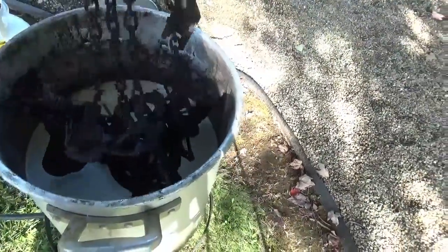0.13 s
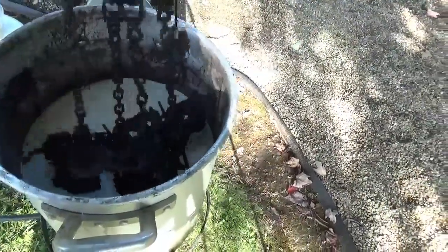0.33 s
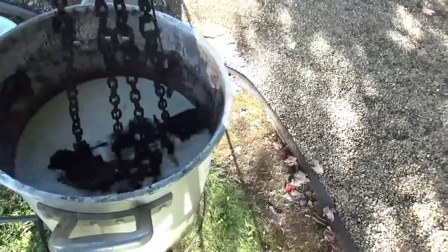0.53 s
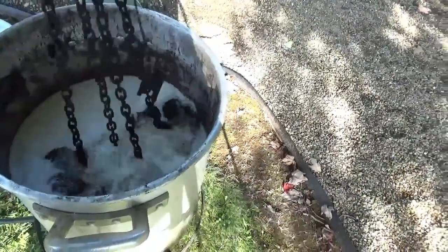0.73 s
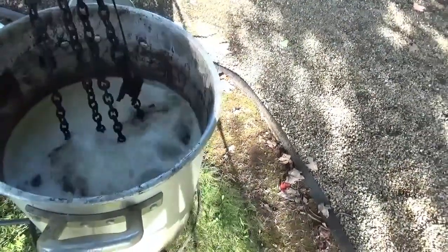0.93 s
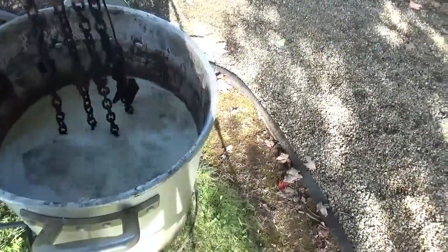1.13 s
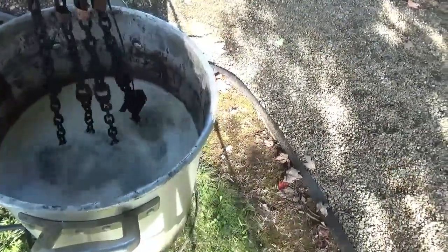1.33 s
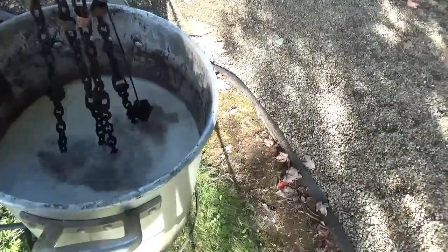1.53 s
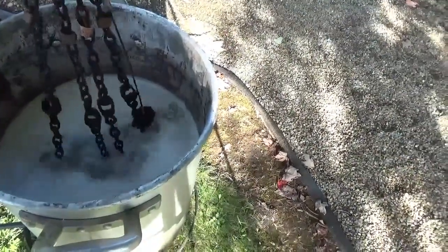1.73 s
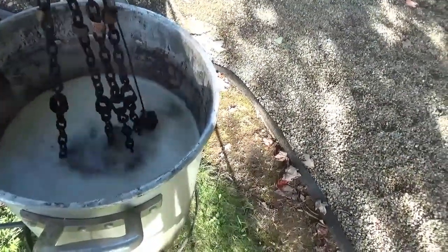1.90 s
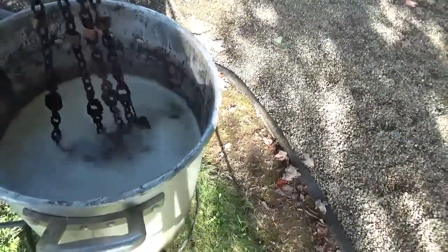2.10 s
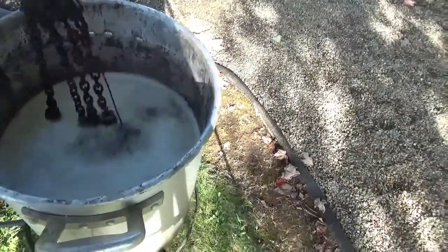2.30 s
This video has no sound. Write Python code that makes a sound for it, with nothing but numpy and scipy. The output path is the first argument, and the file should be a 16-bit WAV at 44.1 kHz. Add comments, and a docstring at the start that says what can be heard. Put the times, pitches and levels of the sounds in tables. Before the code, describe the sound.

Steel traps on chains rattle into a metal pot of water, close and nearly dry, over faint outdoor hiss. Quick scrapes and hard clinks crowd 0-0.45 s, loudest around 0.25; lighter ticks and scrapes follow to 0.75, with thin link pings. Fizz swells near 1 s, then a strong boomy clank at 1.1. Sparse dull knocks follow, thickening from 2.06 into a clattering cluster at 2.26-2.3 with low rising glugs.

```python
"""Steel traps lowered into a pot of hot water

Outdoors, steel traps on chains go down into a metal pot. Stick-slip scrapes and impulsive knocks
excite the damped modes of steel and pot; loose links rustle and ping. Under water the knocks turn
dull as the pot's bass grows, and trapped air glugs up as tones of rising pitch.
Fine fizz swells as water closes over the steel; soft filtered-noise hiss lies under it all.
"""
import sys
import numpy as np
from scipy import signal
from scipy.fft import rfft, irfft, next_fast_len
from scipy.io import wavfile

SR = 44100
rng = np.random.default_rng(int(sys.argv[2]) if len(sys.argv) > 2 else 0)


def persist_wave(psi):
    """Save psi, clipped to +-1, as 16-bit WAV."""
    counts = np.round(np.clip(psi, -1, 1) * 32767).astype(np.int16)
    wavfile.write(sys.argv[1], SR, np.atleast_2d(counts).T)


N = 103943
T = np.arange(N) / SR
AGE = T[:8192]  # time since the start of one event, s

# Steady background, spectrum of its mid part: f/Hz, level/dB
HISS_SPECTRUM = [(20, -26), (40, -30), (80, -11), (160, -13), (330, -10.5), (480, -10.5), (740, -15),
                 (1300, -12.5), (3400, -9), (5200, -12.5), (6500, -12), (11000, -13), (14000, -39)]
# Side part of the background against its mid part: f/Hz, level/dB
HISS_SIDE_SPECTRUM = [(30, -3), (70, -12), (150, -21), (1000, -2), (9000, -8)]
HISS_DB = -44.5  # rms of the mid part before panning

# Rustle of loose links: t/s, level/dB
RUSTLE_LEVEL = [(0, -33.5), (.09, -45.5), (.2, -38.5), (.42, -40), (.49, -58), (.65, -43.5), (.76, -44),
                (.84, -67), (.96, -45), (1.06, -50), (1.25, -53.5), (1.98, -50), (2.12, -44.5), (2.35, -43)]
# Churning of the water: t/s, level/dB
CHURN_LEVEL = [(0, -45), (.4, -44), (.7, -47), (.82, -52.5), (1.03, -49.5), (1.16, -43.5), (1.3, -54.5),
               (1.47, -55.5), (1.75, -47.5), (1.92, -55.5), (2.02, -51), (2.2, -43.5), (2.31, -36),
               (2.36, -49)]
# Bass of the pot, booming only once the traps are in the water: t/s, level/dB
BOOM_LEVEL = [(0, -41), (.22, -35), (.35, -6), (.7, -10), (.95, -9), (1.12, 4), (1.5, 6), (2.3, 9.5)]
# Fizz as the water closes over the steel: t/s, level/dB
FIZZ_LEVEL = [(.7, -56), (.86, -49), (.94, -47.5), (1.06, -46.5), (1.13, -48), (1.3, -58)]
RUSTLE_PER_S, CHURN_PER_S, FIZZ_PER_S = 1000, 900, 400  # mean rates of tiny impacts
BOOM_HZ = 410  # below this the pot's bass is weighted separately

# Spectra of a contact on steel, on bright edges and on the pot, and of the fizz: f/Hz, level/dB
STEEL_SPECTRUM = [(300, -41), (800, -4.5), (1200, 3.5), (2200, 3.5), (2650, -1.5), (3700, 3.5), (5400, 2.5),
                  (6500, -16), (11000, -11)]
RASP_SPECTRUM = [(1000, -88), (5000, -20), (6200, 2.5), (7600, 13.5), (8700, 4.5), (9700, 8.5),
                 (10800, 12.5), (12000, -15)]
POT_SPECTRUM = [(30, -36), (90, -16.5), (160, -3.5), (300, -0.5), (460, -3.5), (750, -1), (1150, -4.5),
                (1600, -1), (2400, -8.5), (6000, -20)]
FIZZ_SPECTRUM = [(400, -24), (750, -18), (1100, 3), (1800, -11), (2600, -24), (3200, -2), (3850, 4),
                 (4700, 8), (5200, -1), (6500, -46)]
FLAT_SPECTRUM = [(1, 0), (SR, 0)]

# Modes of traps and chains, of the pot, and of a free link: f/Hz, level/dB, t60/s
STEEL_MODES = [(1073, 4.5, 0.24), (1370, 6.5, 0.041), (1453, -7.5, 0.21), (1695, -6, 0.21),
               (2040, 10, 0.057), (2226, 12, 0.023), (2585, 3, 0.049), (2945, 13.5, 0.055),
               (3264, 9.5, 0.042), (3750, 12, .025), (4070, -1.5, 0.04), (4000, -7.5, 0.041),
               (4460, 6.5, 0.063), (4880, 5, 0.036), (5120, -36, 0.041)]
POT_MODES = [(257, -20.5, 0.31), (345, -2.5, 0.11), (504, -16.5, 0.057), (635, -7, 0.069), (765, 5, 0.044),
             (724, 6, 0.017), (1050, 1, 0.13), (1130, 4.5, 0.031)]
LINK_MODES = [(3140, -24, .12), (3900, -8.5, 0.049), (8320, -25, 0.62), (9550, -2, 0.049)]
STEEL_RING_DB, POT_RING_DB = -13, -15.5  # ringing against the click of contact
# Reflections inside the pot, against the click of contact
ECHO_DB, ECHO_T60_S, POT_ECHO_DB, POT_ECHO_T60_S = -9.5, 0.038, -12.5, 0.18

# Steel sliding on steel: t/s, length/s, steel level/dB, bright rasp level/dB, pot level/dB,
# rubbed part f/Hz
SCRAPES = [(.003, 0.0087, -37.5, -48, -31, 1350), (0.025, 0.0084, -37, -47, -46, 1700),
           (0.053, .008, -46, -47, -67, 4900), (0.1208, 0.0085, -29, -34.5, -44, 2190),
           (0.131, 0.0067, -26.5, -44, -41, 3650), (0.142, 0.018, -28.5, -39.5, -31, 4660),
           (0.168, 0.036, -32.5, -44, -37.5, 4500), (0.201, 0.018, -24, -48, -64, 1560),
           (0.22, 0.014, -21, -49, -48, 1380), (0.233, .026, -21, -55, -41, 3230),
           (0.262, 0.013, -21, -32.5, -38, 5130), (0.304, 0.014, -33, -40, -35, 1720),
           (0.317, 0.029, -45, -38.5, -44, 3900), (.3448, 0.0057, -26.5, -24.5, -46, 3900),
           (0.3535, 0.028, -25.5, -38, -36.5, 2257), (.397, 0.022, -35, -49, -41.5, 4380),
           (.435, 0.01, -33.5, -42, -35, 4580), (0.543, 0.0043, -39, -46, -66, 4260),
           (0.567, 0.0038, -38, -39.5, -55, 4200), (0.606, .009, -35, -42, -52, 4290),
           (0.627, 0.0064, -47, -41, -38, 3630), (0.635, 0.01, -46, -56, -35.5, 1050),
           (0.665, 0.01, -35.5, -49, -43, 4670), (0.678, 0.0168, -31.5, -38, -36.5, 3750),
           (0.703, 0.012, -37.5, -42.5, -41, 4540), (.721, 0.0027, -30, -32, -40, 4460),
           (1.5, 0.0114, -45.5, -57, -40, 1190), (1.625, 0.007, -50, -64, -37, 1400),
           (2.256, 0.011, -28.5, -36, -29, 1610), (2.301, 0.0076, -38, -59, -31, 2050),
           (2.319, 0.019, -65, -60, -36, 1360)]
SLIPS_PER_S, SLIP_SPREAD_DB = 4500, 3.5
SCRAPE_EDGE_S = 0.0011  # linear rise time and time constant of the fall
RUBBED_PART_DB, RUBBED_PART_T60_S = -5.5, 0.039  # level against the scrape on steel

# Single knocks: t/s, steel level/dB, bright tick level/dB, pot level/dB, struck part f/Hz,
# struck part level/dB
KNOCKS = [(.2337, 5, -26, -32, 3160, 1.5), (.2483, 8, -16, -33, 4450, -24),
          (.3822, -9, -23, -17, 3810, -0.5), (.408, -11, -33, -36, 4540, -13),
          (.5074, -24, -43, -15, 1790, -28), (.5178, -9.5, -24, -6, 790, -32.5),
          (.5552, -8.5, -17.5, -28, 3030, -13.5), (.5956, -12.5, -16.5, -41, 4600, -29),
          (.6312, -8, -31, -33, 3700, -30), (.6597, -21, -18, -18, 3700, -28),
          (.7475, -13, -11.5, -33, 10800, -8.5), (.9155, -17, -24, -38, 3940, -19.5),
          (1.107, 4.5, -6.5, -10, 4410, 0.5), (1.1083, 1.5, -15, -2, 1310, -8),
          (1.1095, -1, -26, -27, 790, -4), (1.141, -12, -36, -14, 4500, -14),
          (1.162, -16, -31, -8.5, 1080, -8), (1.236, -25, -40, -23, 800, -28),
          (1.4955, -14.5, -18, -15, 5070, -14), (1.5325, -17, -19, -36, 3770, -20),
          (1.6235, -35, -44, -17, 764, -20), (1.649, -7.5, -14.5, -24, 5320, -7.5),
          (1.6502, -7, -20, -34, 2920, -11.5), (1.7255, -37, -41, -19.5, 740, -17),
          (1.769, -23, -37, -16, 1810, -31), (2.061, -15, -32, -17, 2000, -19),
          (2.0697, -9, -19, -15, 1870, -11), (2.098, -24, -34, -24, 1340, -20),
          (2.121, -12, -36, -31, 2030, -11.5), (2.1293, -4.5, -32, -14, 5030, -14),
          (2.169, -10.5, -41, -11.5, 2000, -11), (2.186, -13, -39, -17, 760, -10),
          (2.211, -22, -28, -28, 4740, -20), (2.229, -23, -26, -31, 2000, -15),
          (2.2575, 0.5, -12, -22, 5500, 0), (2.2609, -13, -22, -2.5, 1630, -11.5),
          (2.2755, 1, -12, -10.5, 3670, -27), (2.289, -5.5, -12, 0, 5280, 1)]
CHATTER_PEAK_S, CHATTER_DB = 0.00099, -7  # peak of the chatter envelope; gain of its noise
PART_T60_S, PART_RISE_S = 0.01, 0.002
SHUDDER_DB, SHUDDER_T60_S = -2, 0.062  # the pot shudders on, level against the click

# Air glugging out of the traps: t/s, level/dB, starting f/Hz
GLUGS = [(.303, -17, 300), (0.358, -40, 332), (.515, -20, 356), (0.647, -24.5, 345), (0.72, -23.5, 340),
         (1.176, -22.5, 317), (1.634, -37, 340), (1.773, -30, 298), (1.799, -26, 345), (1.85, -27, 241),
         (1.941, -29.5, 296), (2.166, -14.5, 218), (2.262, -17, 300), (2.289, -17, 230), (2.304, -19, 331)]
GLUG_T60_S, GLUG_RISE_S = 0.043, 0.0061
GLUG_GLIDE_PER_S = 2.05  # rise in pitch per second, as a fraction of the starting pitch

# Ringing of a free link: t/s, level/dB
PINGS = [(0.4728, -27.5), (0.778, -20)]

# Gain added on the left and taken from the right
STEEL_PAN_DB, POT_PAN_DB, HISS_PAN_DB, PART_PAN_DB, EDGE_PAN_DB = 0.9, 0.6, 0.55, 1.3, 0.6
CUTOFF_HZ = 11000


def from_db(db):
    """Amplitude gain is ten to the power of a twentieth of the level in decibels."""
    return 10 ** (np.asarray(db) / 20)


def unit(x):
    """Normalisation: each channel is scaled to a sum of squares of one."""
    return x / np.sqrt(np.sum(x ** 2, axis=-1, keepdims=True) + 1e-20)


def pan(db):
    """Intensity stereo: opposite level changes on left and right."""
    return from_db([[db], [-db]])


def add(out, start_s, x):
    """Superposition: an event is summed in from its start time."""
    i = max(int(start_s * SR), 0)
    out[i:i + len(x)] += x[:N - i]


def level(curve):
    """Slow amplitude modulation: gain over time, interpolated in decibels."""
    return from_db(np.interp(T, *np.transpose(curve)))


def colour(x, spectrum):
    """Minimum-phase filtering: folding the cepstrum makes a causal filter from magnitudes."""
    size = next_fast_len(2 * x.shape[-1], real=True)
    size += size % 2
    hz, db = np.transpose(spectrum)
    log_bins = np.log(np.fft.rfftfreq(size, 1 / SR) + 1)
    magnitude = from_db(np.interp(log_bins, np.log(hz), db))
    cepstrum = irfft(np.log(magnitude))
    cepstrum[1:size // 2] *= 2
    cepstrum[size // 2 + 1:] = 0
    response = np.exp(rfft(cepstrum))
    return irfft(rfft(x, size) * response)[..., :x.shape[-1]]


def dying(t60):
    """Exponential damping: the amplitude falls by 60 dB in t60."""
    return np.exp(-np.log(1000) * AGE / t60)


def ringing(modes):
    """Modal superposition: a struck body sounds as a sum of damped cosines."""
    return sum(from_db(db) * dying(t60) * np.cos(2 * np.pi * hz * AGE) for hz, db, t60 in modes)


def contact(spectrum, echo_db, echo_t60, ring=0):
    """Impulse response: click, ringing and decaying noise reflections that differ left and right."""
    noise = rng.standard_normal((2, len(AGE)))
    echoes = from_db(echo_db) * unit(noise * dying(echo_t60))
    click = AGE == 0
    return unit(colour(click + ring + echoes, spectrum))


def play(force, response):
    """Linear response: convolution of a force with a stereo impulse response."""
    return signal.fftconvolve(force[None], response, axes=-1)[:, :N]


def slips(per_s, spread_db):
    """Random impulse train: tiny impacts of uneven size and either sign, with an rms of one."""
    sizes = from_db(spread_db * np.minimum(rng.exponential(1, N), 3))
    signs = rng.choice([-1, 1], N)
    happens = rng.random(N) < per_s / SR
    return unit(sizes * signs * happens) * np.sqrt(N)


def hiss():
    """Mid-side noise: steady and coloured, with its side part faintest in the low mid range."""
    mid, side = unit(colour(rng.standard_normal((2, N)), HISS_SPECTRUM)) * np.sqrt(N)
    side = colour(side, HISS_SIDE_SPECTRUM)
    stereo = mid + side * [[1], [-1]]
    return from_db(HISS_DB) * stereo * pan(HISS_PAN_DB)


def steel(force):
    """Forced modal response: contacts and rustling links excite the traps and chains."""
    force = force + level(RUSTLE_LEVEL) * slips(RUSTLE_PER_S, spread_db=0.5)
    ring = from_db(STEEL_RING_DB) * unit(ringing(STEEL_MODES))
    return play(force, contact(STEEL_SPECTRUM, ECHO_DB, ECHO_T60_S, ring))


def pot(force):
    """Forced modal response: contacts and churn drive the wall; its bass grows as the traps sink."""
    force = force + level(CHURN_LEVEL) * slips(CHURN_PER_S, spread_db=1.5)
    high_pass = signal.butter(2, BOOM_HZ, "high", fs=SR, output="sos")
    low_pass = signal.butter(2, BOOM_HZ, "low", fs=SR, output="sos")
    thin = signal.sosfilt(high_pass, force)
    bass = signal.sosfilt(low_pass, force)
    ring = from_db(POT_RING_DB) * unit(ringing(POT_MODES))
    response = contact(POT_SPECTRUM, POT_ECHO_DB, POT_ECHO_T60_S, ring)
    # these two bands are in opposite phase at the crossover, hence the minus
    return play(thin - level(BOOM_LEVEL) * bass, response)


def fizz():
    """Shot noise: tiny bubbles burst at the surface as random coloured impulses."""
    bursts = level(FIZZ_LEVEL) * slips(FIZZ_PER_S, spread_db=1.5)
    return play(bursts, contact(FIZZ_SPECTRUM, ECHO_DB, ECHO_T60_S))


def scrapes():
    """Stick-slip friction: runs of slips act on steel, edges and pot, and ring the rubbed part."""
    forces, parts = np.zeros((3, N)), np.zeros(N)
    grain = slips(SLIPS_PER_S, SLIP_SPREAD_DB)
    for start, length, steel_db, rasp_db, pot_db, hz in SCRAPES:
        rise = np.minimum(AGE / SCRAPE_EDGE_S, 1)
        fall = np.exp(-np.maximum(AGE - length, 0) / SCRAPE_EDGE_S)
        local_grain = np.roll(grain, -int(start * SR))[:len(AGE)]
        run = unit(local_grain * rise * fall)
        size = np.sqrt(length * SR)  # energy grows with length
        for force, db in zip(forces, (steel_db, rasp_db, pot_db)):
            add(force, start, from_db(db) * size * run)
        ring = unit(signal.fftconvolve(run, ringing([(hz, 0, RUBBED_PART_T60_S)])))
        add(parts, start, from_db(steel_db + RUBBED_PART_DB) * size * ring)
    return forces, parts


def knocks():
    """Impact excitation: a click thumps the pot, chatters on steel and rings the struck part."""
    forces, parts = np.zeros((3, N)), np.zeros(N)
    click = 1.0 * (AGE == 0)
    swell = AGE / CHATTER_PEAK_S * np.exp(1 - AGE / CHATTER_PEAK_S)
    for start, steel_db, tick_db, pot_db, hz, part_db in KNOCKS:
        chatter = from_db(CHATTER_DB) * rng.standard_normal(len(AGE)) * swell
        blow = unit(click + chatter)
        add(forces[0], start, from_db(steel_db) * blow)
        add(forces[1], start, from_db(tick_db) * blow)
        shudder = unit(rng.standard_normal(len(AGE)) * dying(SHUDDER_T60_S))
        thump = unit(click + from_db(SHUDDER_DB) * shudder)
        add(forces[2], start, from_db(pot_db) * thump)
        ring = ringing([(hz, 0, PART_T60_S)]) * (1 - np.exp(-AGE / PART_RISE_S))
        add(parts, start, from_db(part_db) * unit(ring))
    return forces, parts


def glugs():
    """Bubble resonance: each large bubble is a damped tone that swells, rises in pitch and dies."""
    out = np.zeros(N)
    for start, db, hz in GLUGS:
        phase = 2 * np.pi * hz * (AGE + GLUG_GLIDE_PER_S * AGE ** 2 / 2)
        envelope = dying(GLUG_T60_S) * (1 - np.exp(-AGE / GLUG_RISE_S))
        add(out, start, from_db(db) * np.sin(phase) * envelope)
    return out


def pings():
    """Free vibration: a loose link rings in its own modes."""
    out = np.zeros(N)
    for start, db in PINGS:
        add(out, start, from_db(db) * ringing(LINK_MODES))
    return out


def scene():
    """Superposition: all contacts drive the same steel and pot, a little left of centre."""
    blows, struck = knocks()
    runs, rubbed = scrapes()
    on_steel, on_edges, on_pot = blows + runs
    parts = play(struck + rubbed, contact(FLAT_SPECTRUM, ECHO_DB, ECHO_T60_S))
    bright = play(on_edges, contact(RASP_SPECTRUM, ECHO_DB, ECHO_T60_S)) + pings()
    wet = pot(on_pot) + glugs() + fizz()
    metal = steel(on_steel) * pan(STEEL_PAN_DB) + parts * pan(PART_PAN_DB) + bright * pan(EDGE_PAN_DB)
    return metal + wet * pan(POT_PAN_DB) + hiss()


def record(dry):
    """Band limiting: an elliptic low-pass cuts the top steeply."""
    low_pass = signal.ellip(9, 0.3, 62, CUTOFF_HZ, fs=SR, output="sos")  # order, ripple dB, stop dB
    return signal.sosfilt(low_pass, dry)


dry = scene()
out = record(dry)
persist_wave(out)
```